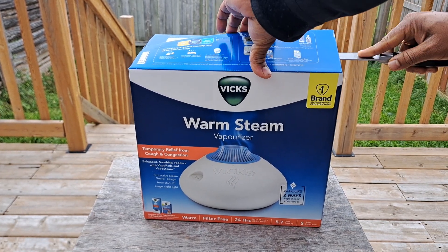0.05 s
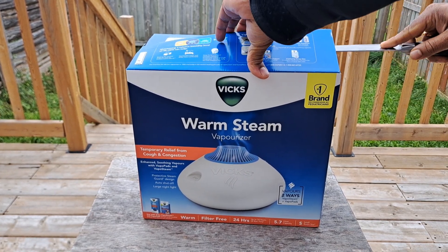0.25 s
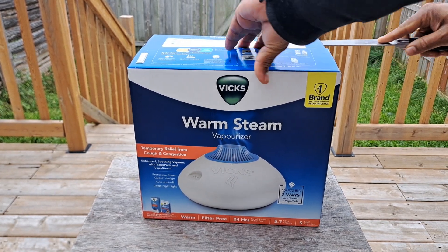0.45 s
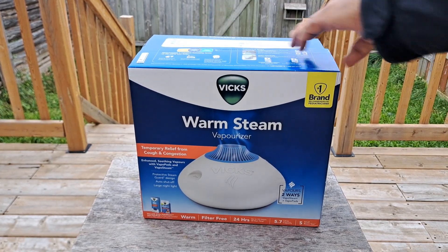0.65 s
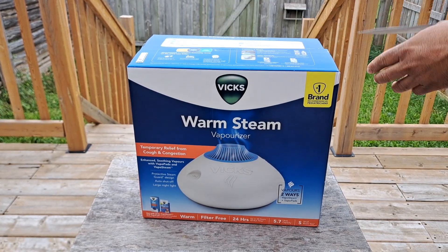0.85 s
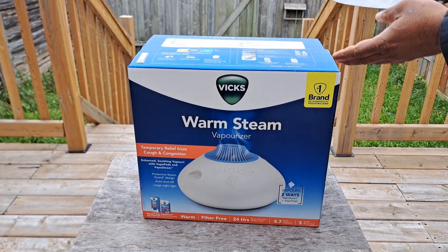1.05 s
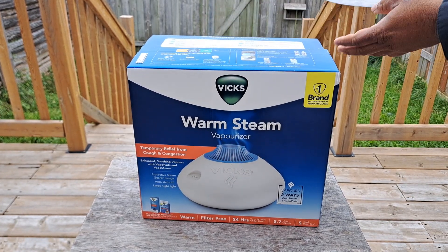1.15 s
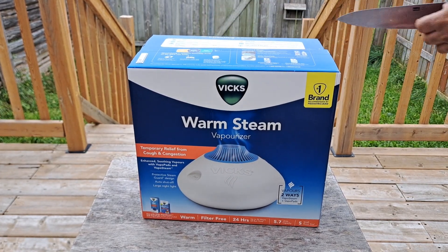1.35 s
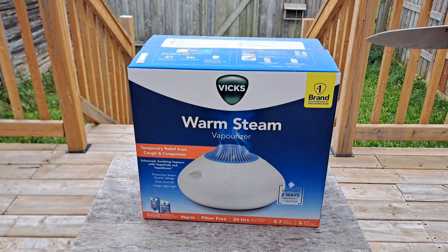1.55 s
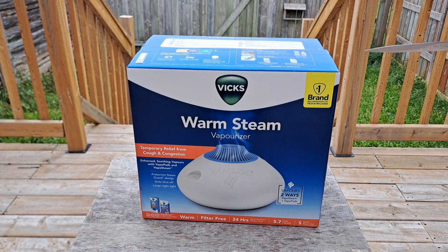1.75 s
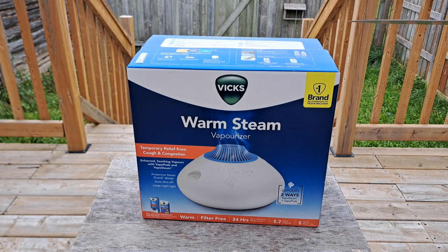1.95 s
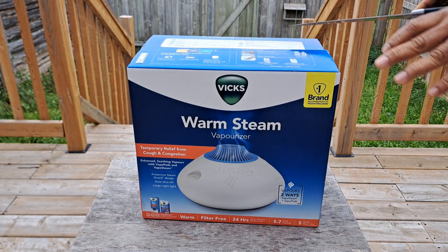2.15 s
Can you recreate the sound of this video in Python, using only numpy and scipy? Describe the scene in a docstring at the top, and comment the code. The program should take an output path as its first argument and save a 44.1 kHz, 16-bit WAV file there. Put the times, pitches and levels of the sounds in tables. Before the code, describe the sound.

Close by on an outdoor deck, a cardboard box is cut open: a small pop, a louder hollow thump, then papery scraping, tape ticks and lighter knocks. A jacket sleeve rustles softly afterwards against a faint distant rumble.

```python
"""Knife opening a cardboard box

A large box on a wooden deck, outdoors. A knife works under the taped lid: the flap gives with a small
pop, then a loud hollow thump, both ringing the box's modes. Tape ticks on the blade, the blade scrapes
paper fibres in the slit, and the box settles as the hand lets go. Deck and fence add a thin echo.
A jacket sleeve swishes as the arm moves away, over a low distant rumble."""
import sys
import numpy as np
from scipy import signal
from scipy.fft import rfft, irfft
from scipy.io import wavfile

SR = 44100
rng = np.random.default_rng(int(sys.argv[2]) if len(sys.argv) > 2 else 0)


def file_out(sig):
    """Save sig as 16-bit WAV at sys.argv[1]."""
    # one column per channel
    cols = np.atleast_2d(sig).T
    # limit, then scale
    lim = np.clip(cols, -1, 1)
    pcm = np.round(lim * 32767).astype(np.int16)
    wavfile.write(sys.argv[1], SR, pcm)


N = 97020
TIME_S = np.arange(N) / SR
FREQ_HZ = np.maximum(np.arange(N // 2 + 1) * SR / N, 1)

# knocks on the box (time [s], level [dB], brightness [Hz], bass edge [Hz], pitch [ratio],
# share of free ring time [ratio], crack level [dB])
BOX_KNOCKS = [(0.1925, -25, 900, 200, .93, .4, -41), (0.2020, -5, 2400, 380, .92, .45, -28),
              (0.2135, -20, 2400, 450, .93, .7, -36), (0.4078, -21, 1500, 200, 1.0, .25, -22),
              (0.4108, 2, 2200, 20, 1.0, .95, -29), (0.4325, -19, 2200, 1000, 1.0, .7, -32),
              (0.4475, -22, 1800, 800, .96, .8, -36), (0.4870, -22, 600, 120, 1.0, .8, -52),
              (0.5620, -26, 450, 100, .96, .9, -56), (0.5960, -28, 500, 100, .96, .8, -52),
              (0.6270, -31, 2000, 1200, 1.0, .8, -45), (0.6470, -7, 150, 110, .9, .55, -58),
              (0.6945, -15, 1000, 150, .9, .7, -44), (0.7170, -20, 750, 150, .93, .9, -52),
              (0.7885, -12, 520, 520, .89, .42, -54)]
# modes of cavity and panels (frequency [Hz], level [dB], free t60 [s])
BOX_MODES = [(70, -33, 0.24), (121, -23, 0.11), (169, -26.5, 0.22), (241.5, -20, 0.24), (307, -29, 0.31),
             (390, -19, .065), (450, -11, .12), (484, -27, .16), (548.4, -26.5, 0.11), (646, -19.5, 0.058),
             (759, -18, 0.042), (818, -19.5, 0.049), (1050, -35.5, 0.12), (1170, -38, 0.071)]
# papery crack (frequency [Hz], level [dB])
CRACK_SPECTRUM = [(300, -18), (900, 18.5), (1250, 2.5), (1650, 4.5), (2100, 4.5), (2600, -3.5),
                  (3200, -14.5), (5500, -14), (7300, -22.5), (8500, -27), (12000, -39), (16000, -40)]
# loose flaps (frequency [Hz], level [dB])
FLUTTER_SPECTRUM = [(60, -22), (120, 13), (250, 10.5), (500, 3.5), (800, -8), (1200, 6), (1600, -33),
                    (2300, -22), (3500, -26.5), (16000, -76)]
# tape snaps (time [s], level [dB], low edge [Hz], left-right [dB], t60 [s])
TAPE_TICKS = [(0.1915, -39, 4440, 1, 0.014), (0.2022, -35, 4000, -3, 0.022),
              (0.345, -49.5, 3450, -7, 0.016), (0.4424, -32, 5500, 5, 0.0057),
              (0.4493, -34, 9000, 7.5, .004), (0.4560, -40, 9100, 2, 0.022),
              (0.4627, -52, 9000, 2.5, 0.011), (0.54, -51, 3500, 3, 0.022),
              (0.5515, -36, 12200, 17, 0.0058), (0.564, -37, 8000, -2, 0.0099),
              (0.5710, -42, 10000, 6, .015), (0.5846, -43, 6930, 11, 0.012),
              (0.5900, -39, 3820, 1.5, 0.027)]
# tape snap before its high-pass (frequency [Hz], level [dB])
TICK_SPECTRUM = [(2000, 15.5), (5000, 6), (7300, 9), (8700, -5), (11000, 3.5), (13000, -0.5), (16000, -3.5)]
# blade rubbing in the slit (time [s], level [dB])
SCRAPE_ENVELOPE = [(0, -60), (.18, -53.5), (.215, -36), (.27, -54.5), (.35, -49), (.39, -48), (.45, -36),
                   (.48, -47.5), (.53, -46), (.585, -39.5), (.61, -40.5), (.665, -41.5), (.705, -41.5),
                   (.75, -49.5), (.88, -58.5), (.98, -112)]
# blade on paper (frequency [Hz], level [dB])
SCRAPE_SPECTRUM = [(200, 18), (700, 0.5), (1300, 1), (2300, -4.5), (3500, -12), (5000, -9), (7000, -14),
                   (8700, -19), (13000, -16), (16000, -21)]
# added pan of the scrape (frequency [Hz], left-right [dB])
SCRAPE_PAN = [(2000, -1), (6000, 1.5), (12000, -1.5)]
# hiss as the blade comes free (time [s], level [dB])
EXIT_HISS_ENVELOPE = [(.62, -88), (.69, -61), (.77, -73), (.83, -70.5), (.92, -74), (.98, -90)]
# hand and arm bumps (peak time [s], level [dB], half-length [s])
HAND_BUMPS = [(0.003, -42.5, 0.041), (0.167, -44.5, 0.026), (0.396, -41.5, 0.017), (0.825, -42, 0.0074),
              (1.09, -46, 0.013)]
# dull bump (frequency [Hz], level [dB])
BUMP_SPECTRUM = [(50, 13.5), (110, 2.5), (160, 3), (235, 5), (330, -3), (450, 2.5), (700, -8.5),
                 (1500, -21), (8000, -48)]
# arm moves (peak time [s], level [dB], rise [s], fall [s])
SLEEVE_SWISHES = [(1.106, -56, 0.048, 0.031), (1.62, -67, 0.37, 0.45), (2.042, -52.5, .075, 0.047),
                  (2.195, -59, 0.017, .03)]
# cloth on cloth (frequency [Hz], level [dB])
SLEEVE_SPECTRUM = [(150, -4), (300, 1), (600, 0), (1300, -6.5), (2500, -5.5), (3100, -9), (4300, -9.5),
                   (7000, -13.5), (8700, -23), (13000, -20.5), (16000, -26)]
# faint tones in the swish (frequency [Hz], width [Hz], level [dB])
SLEEVE_TONES = [(1697, 71, 5.5), (2160, 120, 1), (4130, 260, -5)]
# scatter from deck, rails and fence (frequency [Hz], level [dB])
ECHO_SPECTRUM = [(600, 18), (1200, -11), (3000, 8.5), (8000, -0.5), (16000, 8.5)]
# distant rumble and hiss (frequency [Hz], level [dB])
RUMBLE_SPECTRUM = [(22, -31), (32, -4), (42, -0.5), (56, 3.5), (75, -2), (112, 0.5), (160, -11),
                   (240, -11.5), (330, -14), (500, -17.5), (800, -17), (1300, -24.5), (2000, -28),
                   (3000, -39), (4400, -35), (6800, -37), (8400, -46.5), (12000, -45.5), (16000, -60)]
# open-air stereo width (frequency [Hz], left-right correlation [-1..1])
STEREO_CORRELATION = [(60, .97), (140, 0.97), (290, 0.88), (640, 0.28), (1400, -0.17), (3000, 0.12),
                      (15000, -0.13)]
# stereo balance of the noise (frequency [Hz], left-right [dB])
STEREO_BALANCE = [(60, -0.5), (380, 0.5), (700, -1.5), (2400, -1.5), (4400, -5.5), (8000, -3), (15000, 3)]


def from_db(db):
    """Decibels to gain."""
    return 10 ** (np.asarray(db) / 20)


def unit_rms(x):
    """Scale to rms 1."""
    return x / np.sqrt(np.mean(x ** 2) + 1e-20)


def over_hz(points):
    """Interpolate (frequency [Hz], value) points on a log axis."""
    hz, value = np.transpose(points)
    return np.interp(np.log(FREQ_HZ), np.log(hz), value)


def pan(db):
    """Left and right gains for a level difference."""
    return from_db(np.array([[.5], [-.5]]) * db)


def rolloff(ratio):
    """Gain of 1 at ratio 0, one half at ratio 1."""
    return 1 / (1 + ratio ** 2)


def coloured(spectrum, source=None):
    """Stereo noise, or a given signal pair, with this spectrum and open-air width; rms 1."""
    mid, side = rfft(rng.standard_normal((2, N)) if source is None else source)
    correlation = np.clip(over_hz(STEREO_CORRELATION), -.99, .99)
    pair = np.sqrt(1 + correlation) * mid + np.sqrt(1 - correlation) * side * np.array([[1], [-1]])
    gain = from_db(over_hz(spectrum)) * pan(over_hz(STEREO_BALANCE)) * rolloff(20 / FREQ_HZ)
    return unit_rms(irfft(pair * gain, N))


def burst(start_s, rise_s, t60_s):
    """Envelope: fast rise, exponential decay."""
    age_s = np.maximum(TIME_S - start_s, 0)
    attack = 1 - np.exp(-(age_s / rise_s) ** 2)
    return attack * np.exp(-np.minimum(np.log(1000) * age_s / t60_s, 100))


def high_pass(x, edge_hz):
    """Third-order Butterworth high-pass."""
    return signal.sosfilt(signal.butter(3, edge_hz, "high", fs=SR, output="sos"), x)


def box_knocks(rise_s=0.00024, scatter_db=0.5, flutter_db=-25, flutter_ref_hz=400):
    """Each knock rings the box's modes, cracks the paper and sets the loose flaps fluttering."""
    body, crack, flutter = np.zeros((3, N))
    t = TIME_S[:SR // 2]
    for start_s, db, bright_hz, bass_hz, pitch, ring_share, crack_db in BOX_KNOCKS:
        start = int(start_s * SR)
        for k, (hz, mode_db, t60_s) in enumerate(BOX_MODES):
            gain = from_db(db + mode_db + scatter_db * rng.standard_normal())
            # duller for a soft touch, thinner near a stiff edge, shorter under the hand
            gain *= rolloff(hz / bright_hz) * rolloff(bass_hz / hz)
            envelope = (1 - np.exp(-t / rise_s)) * np.exp(-np.log(1000) * t / (t60_s * ring_share))
            swing = (-1) ** k * np.sin(2 * np.pi * hz * pitch * t)
            body[start:start + len(t)] += gain * envelope * swing
        crack += from_db(crack_db) * burst(start_s, rise_s=0.00083, t60_s=0.039)
        touch = rolloff(flutter_ref_hz / bright_hz) * rolloff(bass_hz / flutter_ref_hz)
        flutter += from_db(db + flutter_db) * touch * burst(start_s, rise_s, t60_s=0.21)
    return body + crack * coloured(CRACK_SPECTRUM) + flutter * coloured(FLUTTER_SPECTRUM)


def tape_ticks(fizz_db=-18.5):
    """Tape snaps on the blade's edge: a bright tick, then a short fizz."""
    ticks, noise = np.zeros((2, N)), coloured(TICK_SPECTRUM)
    for start_s, db, edge_hz, pan_db, t60_s in TAPE_TICKS:
        snap = burst(start_s, rise_s=0.0002, t60_s=t60_s)
        fizz = from_db(fizz_db) * burst(start_s, rise_s=0.0027, t60_s=0.072)
        ticks += from_db(db) * pan(pan_db) * (snap + fizz) * unit_rms(high_pass(noise, edge_hz))
    return ticks


def blade_scrape(fibres_per_s=4000, spread_db=3.5, fibre_share=0.7):
    """The blade plucks a dense stream of paper fibres over smooth friction hiss."""
    plucks = from_db(spread_db * np.minimum(rng.exponential(1, (2, N)), 5))
    plucks *= rng.choice([-1, 1], (2, N))
    fibres = unit_rms(plucks * (rng.random(N) < fibres_per_s / SR))
    friction = rng.standard_normal((2, N))
    rub = coloured(SCRAPE_SPECTRUM, np.sqrt(fibre_share) * fibres + np.sqrt(1 - fibre_share) * friction)
    level_db = np.interp(TIME_S, *np.transpose(SCRAPE_ENVELOPE))
    return from_db(level_db) * irfft(rfft(rub) * pan(over_hz(SCRAPE_PAN)), N)


def blade_exit_hiss(centre_hz=12100, sigma_hz=1300):
    """Narrow, very high hiss as the blade leaves the slit."""
    band = np.exp(-((FREQ_HZ - centre_hz) / sigma_hz) ** 2 / 2)
    hiss = unit_rms(irfft(rfft(rng.standard_normal((2, N))) * band, N))
    level_db = np.interp(TIME_S, *np.transpose(EXIT_HISS_ENVELOPE), left=-120, right=-120)
    return from_db(level_db) * hiss


def hand_bumps():
    """Soft, dull bumps as hand and arm move."""
    envelope = sum(from_db(db) * np.exp(-((TIME_S - peak_s) / half_s) ** 2)
                   for peak_s, db, half_s in HAND_BUMPS)
    return envelope * coloured(BUMP_SPECTRUM)


def sleeve_swish(tones_db=-9):
    """Cloth slides on cloth, swelling with each arm move; faint narrow tones colour it."""
    envelope = sum(from_db(db) * rolloff((TIME_S - peak_s) / np.where(TIME_S < peak_s, rise_s, fall_s))
                   for peak_s, db, rise_s, fall_s in SLEEVE_SWISHES)
    peaks = sum(from_db(db) * rolloff(2 * (FREQ_HZ - hz) / width_hz) for hz, width_hz, db in SLEEVE_TONES)
    white = rfft(rng.standard_normal((2, N)))
    tones = unit_rms(irfft(white * peaks * pan(over_hz(STEREO_BALANCE)), N))
    return envelope * (coloured(SLEEVE_SPECTRUM) + from_db(tones_db) * tones)


def yard_echo(direct, level_db=-9.5):
    """Deck, rails and fence scatter back a thin echo."""
    response = coloured(ECHO_SPECTRUM) * burst(start_s=0.011, rise_s=0.0025, t60_s=0.25)
    response /= np.sqrt(np.sum(response ** 2) / 2)
    echo = signal.fftconvolve(high_pass(direct, edge_hz=750), response, axes=1)
    return from_db(level_db) * echo[:, :N]


def distant_rumble(level_db=-49):
    """Steady outdoor rumble with a thin hiss above it."""
    return from_db(level_db) * coloured(RUMBLE_SPECTRUM)


def scene():
    """Box, tape and blade with their echo; hand, sleeve and open air."""
    cutting = box_knocks() + tape_ticks() + blade_scrape()
    return cutting + yard_echo(cutting) + blade_exit_hiss() + hand_bumps() + sleeve_swish() + distant_rumble()


def record(dry):
    """Steep elliptic low-pass."""
    cutoff_hz = 15900
    return signal.sosfilt(signal.ellip(10, .1, 80, cutoff_hz, fs=SR, output="sos"), dry)


dry = scene()
out = record(dry)
file_out(out)
```